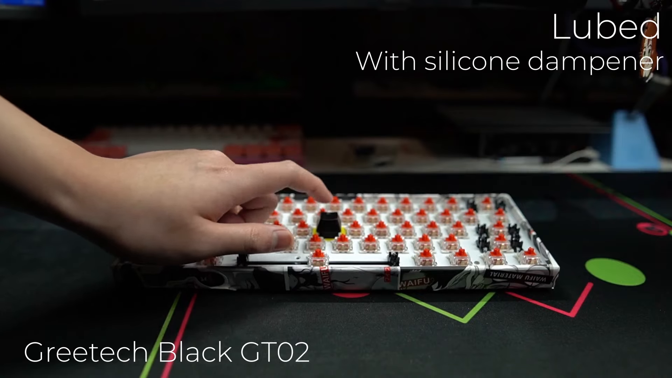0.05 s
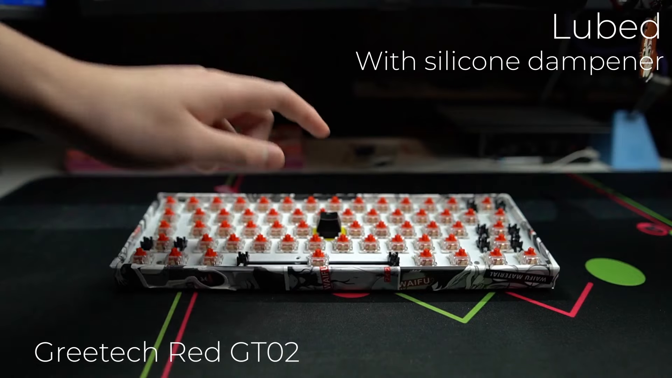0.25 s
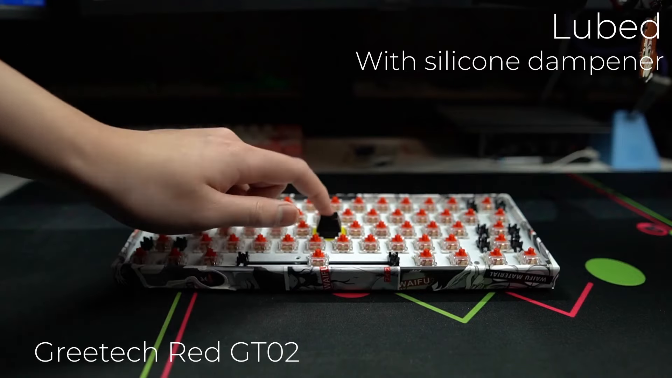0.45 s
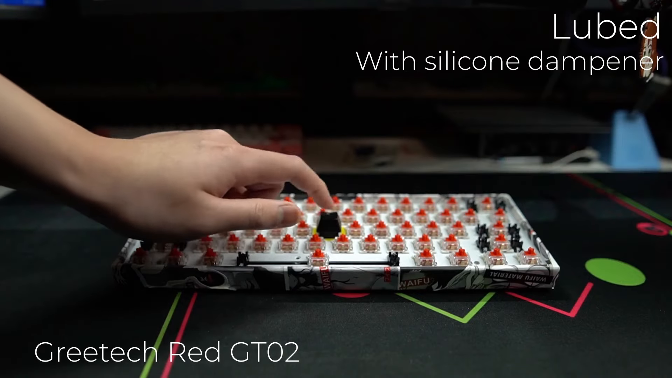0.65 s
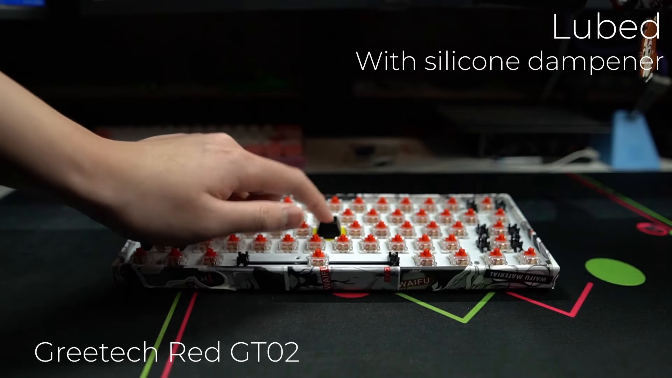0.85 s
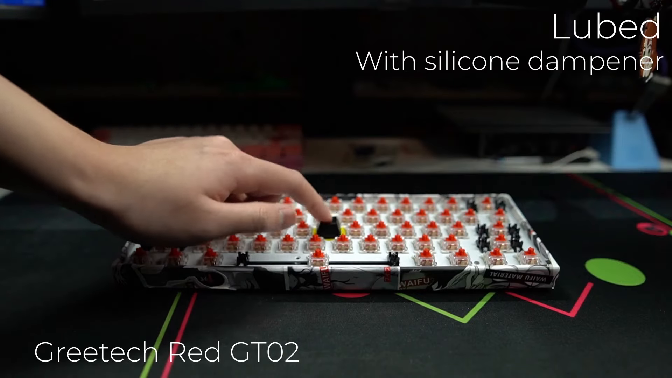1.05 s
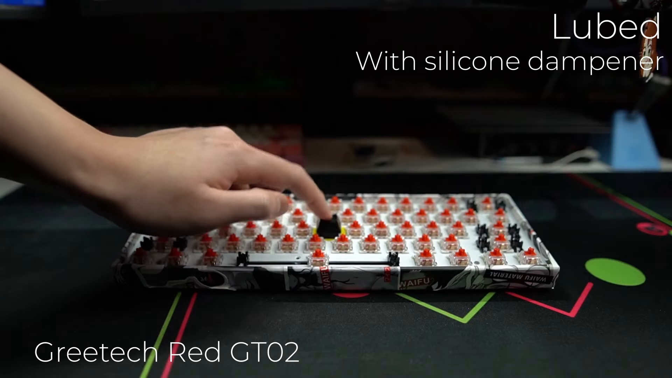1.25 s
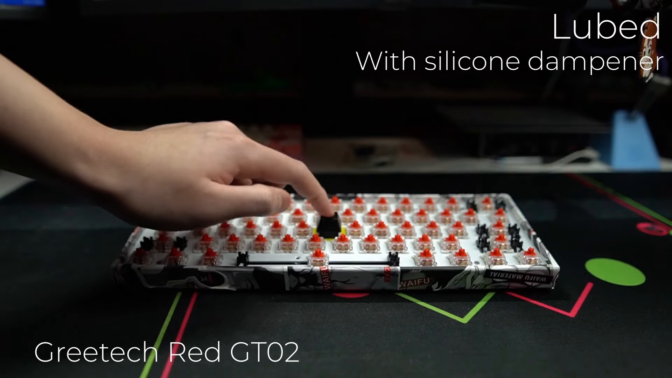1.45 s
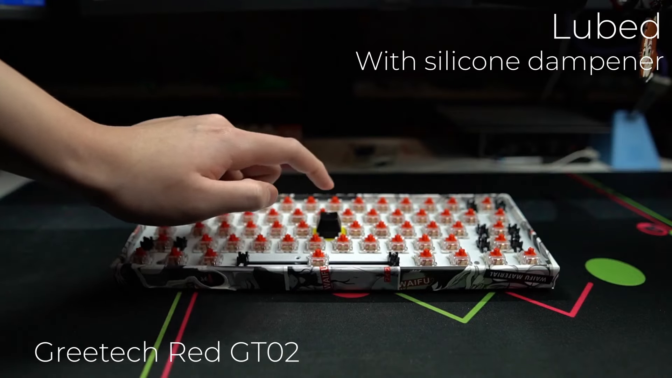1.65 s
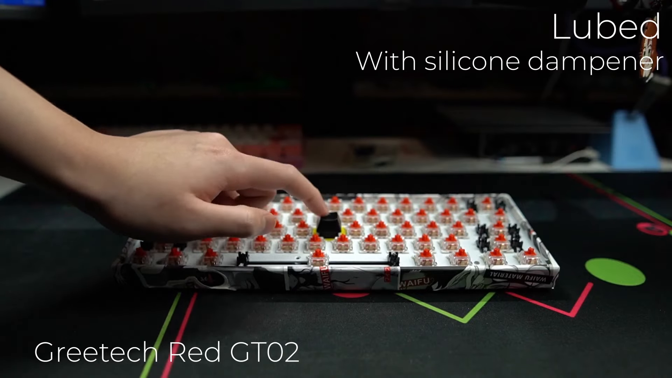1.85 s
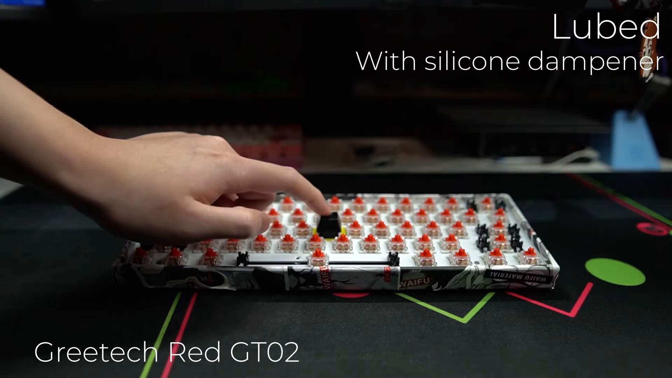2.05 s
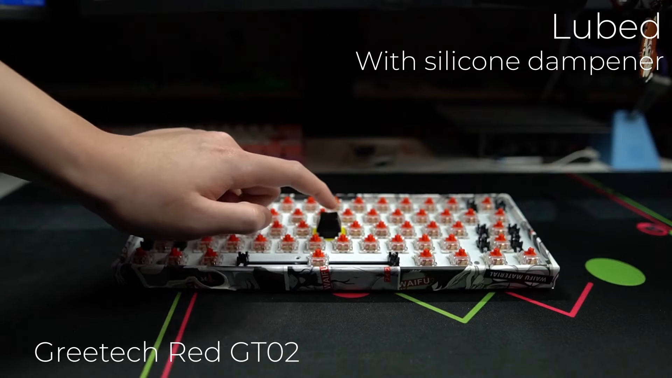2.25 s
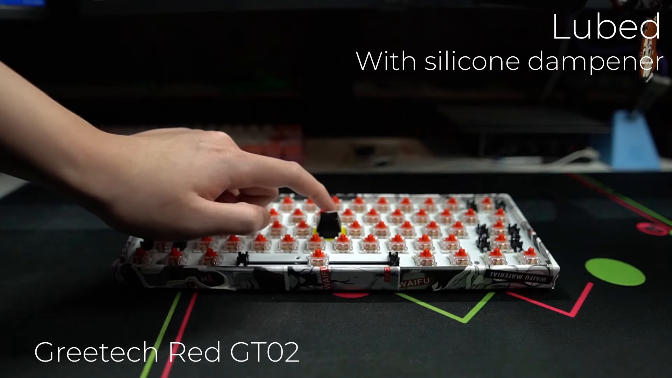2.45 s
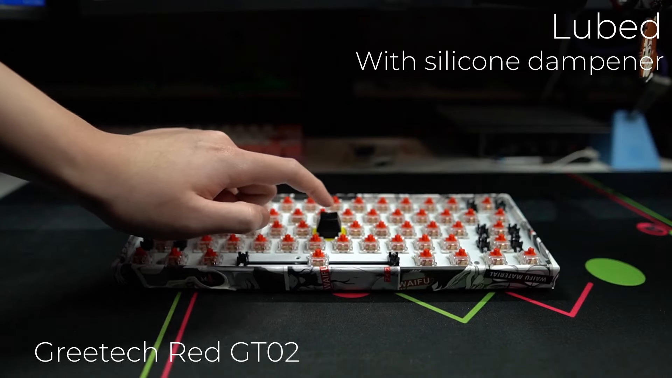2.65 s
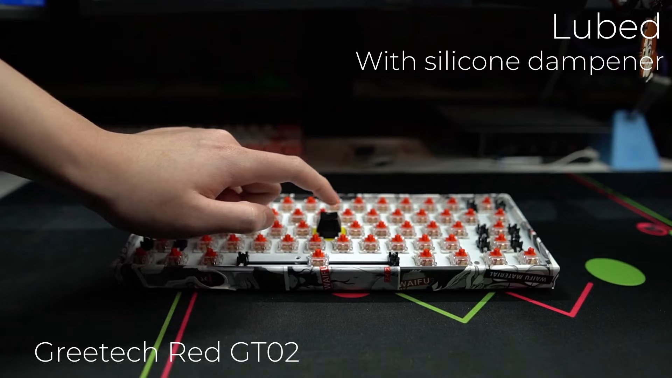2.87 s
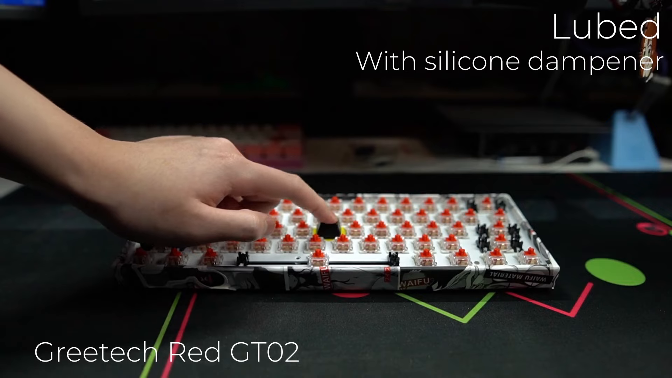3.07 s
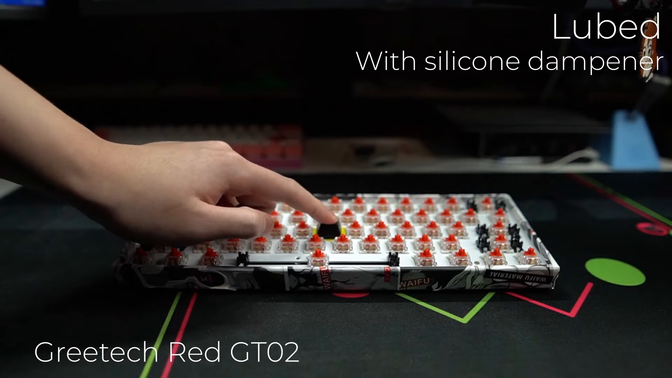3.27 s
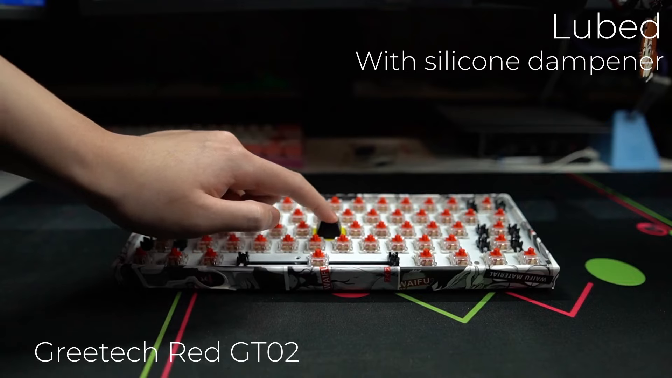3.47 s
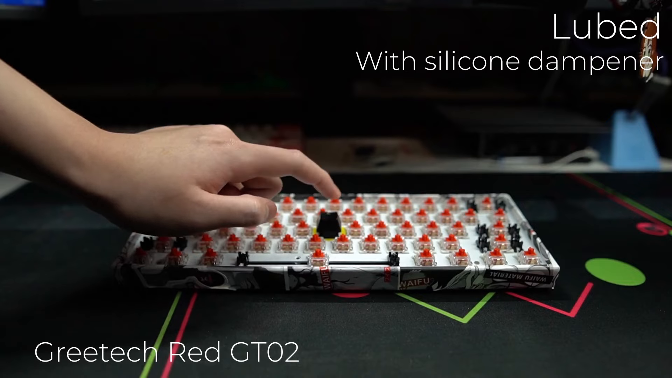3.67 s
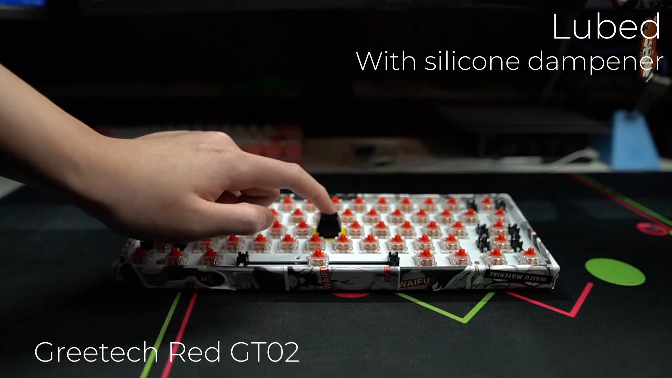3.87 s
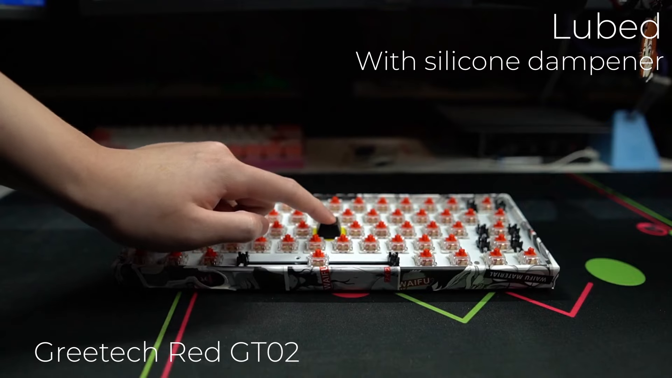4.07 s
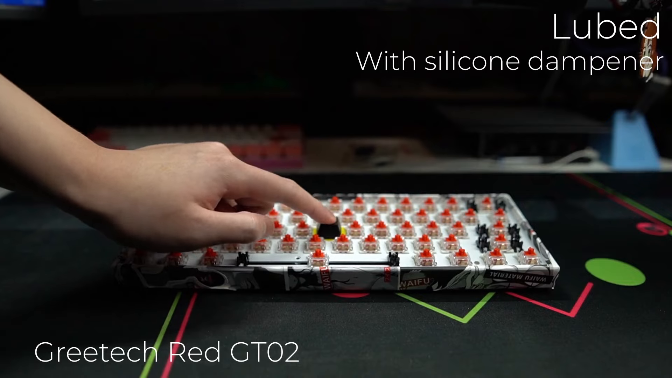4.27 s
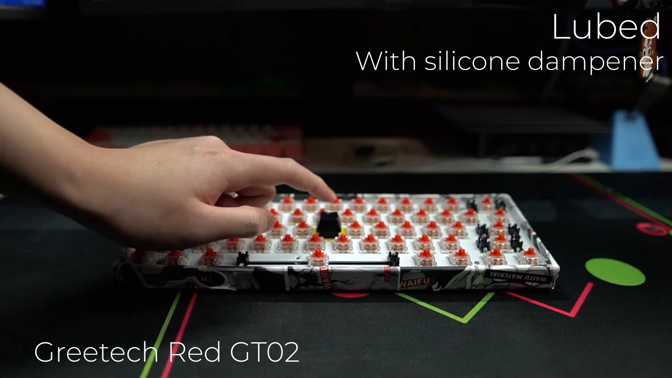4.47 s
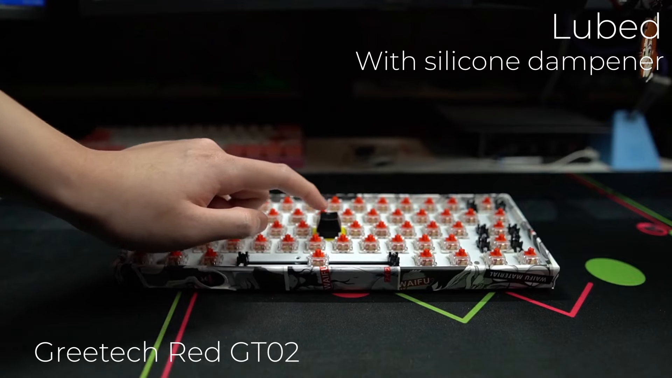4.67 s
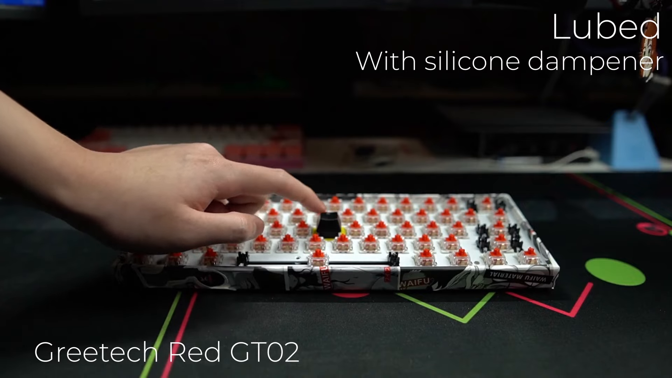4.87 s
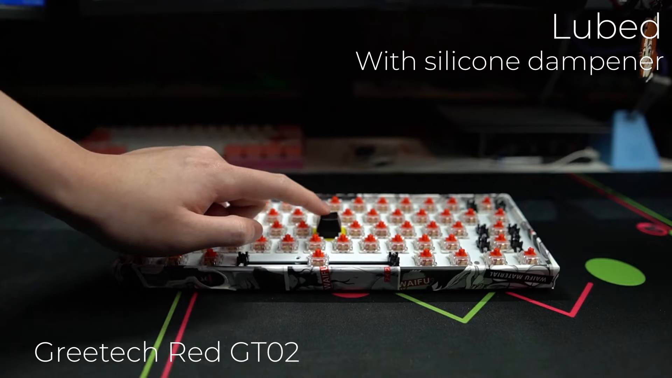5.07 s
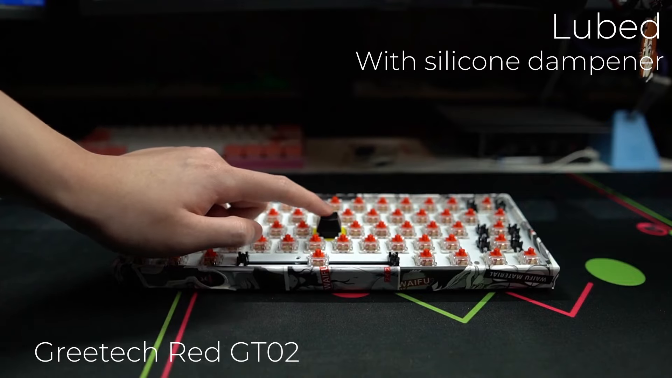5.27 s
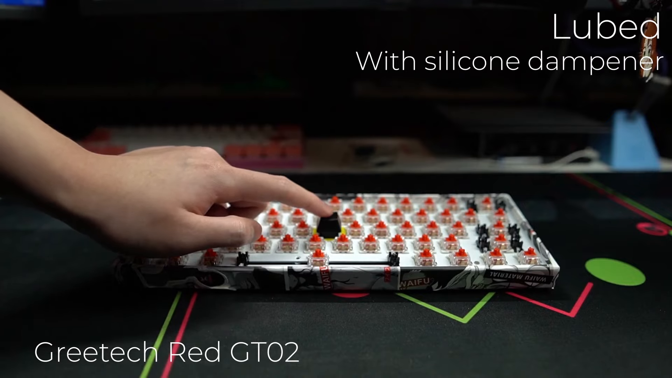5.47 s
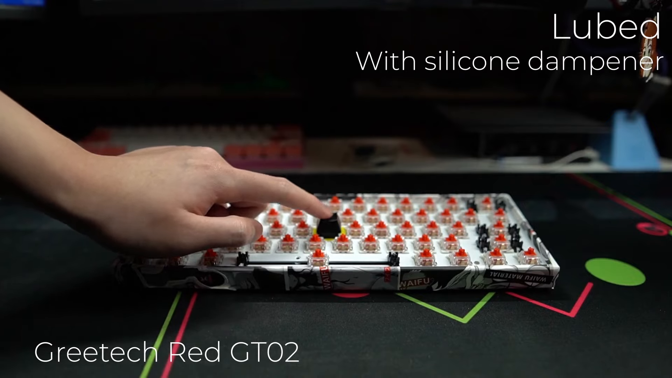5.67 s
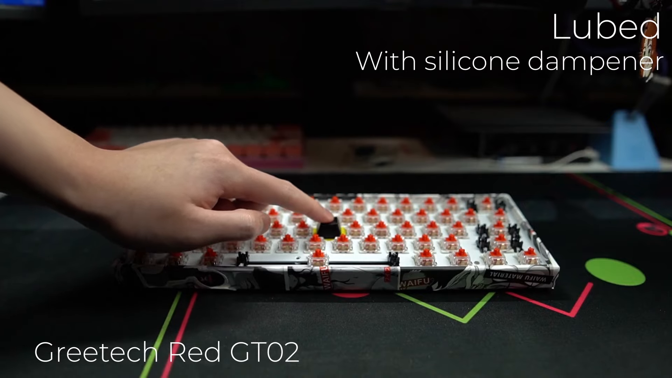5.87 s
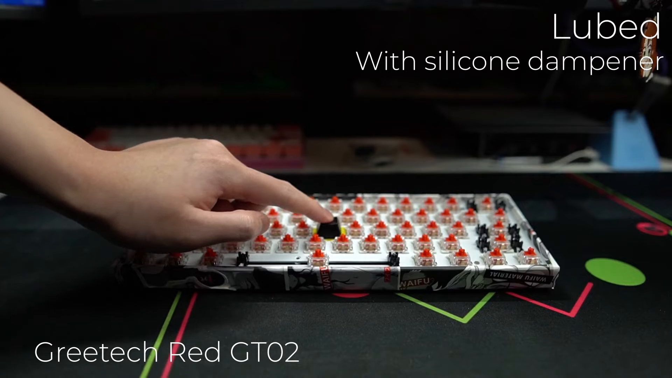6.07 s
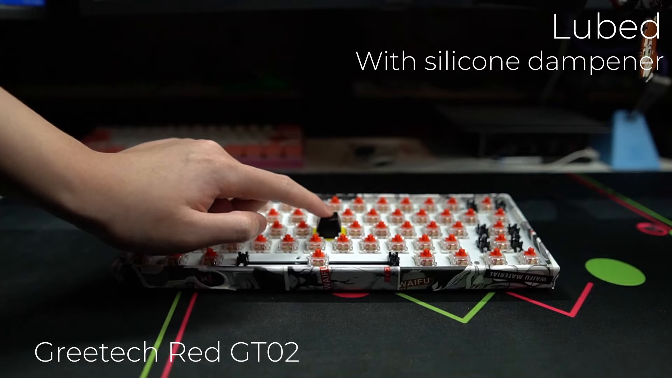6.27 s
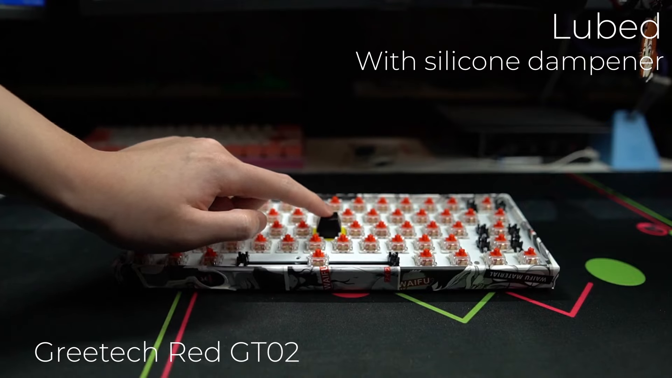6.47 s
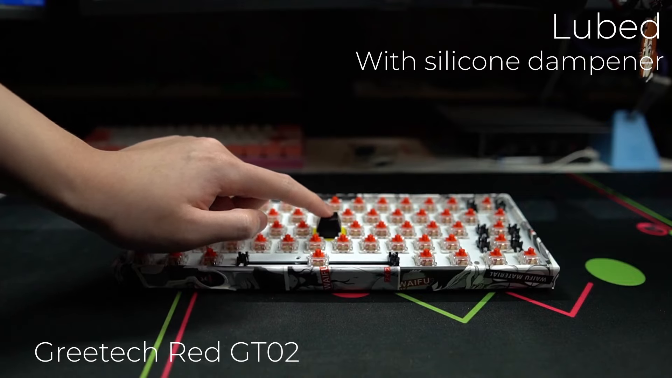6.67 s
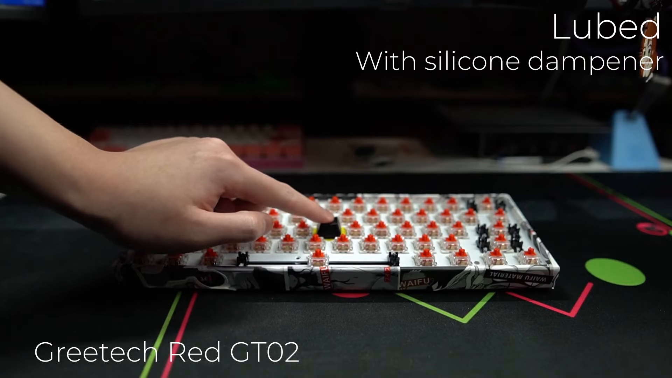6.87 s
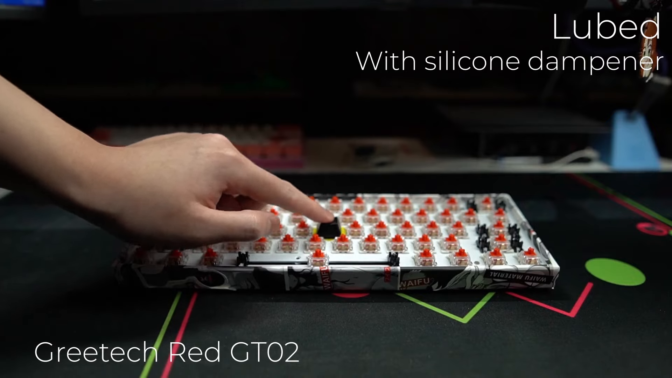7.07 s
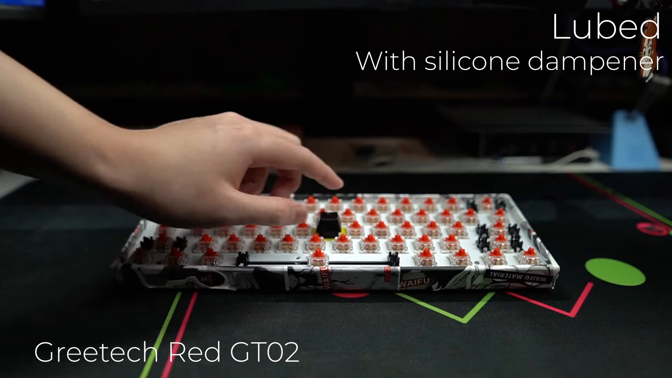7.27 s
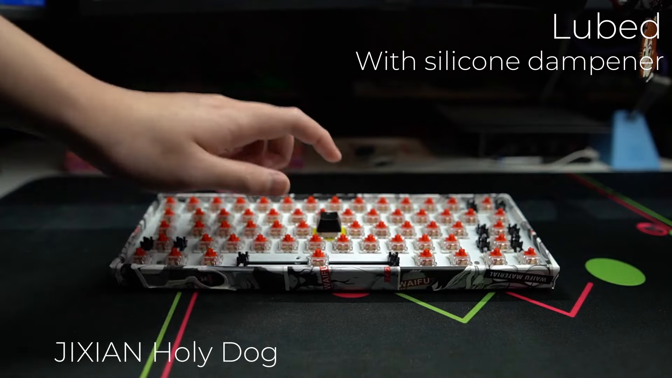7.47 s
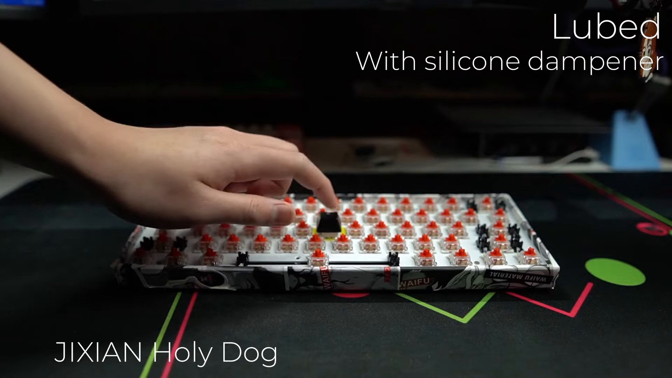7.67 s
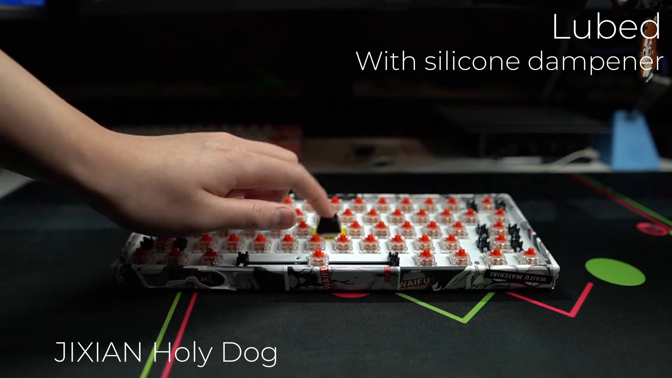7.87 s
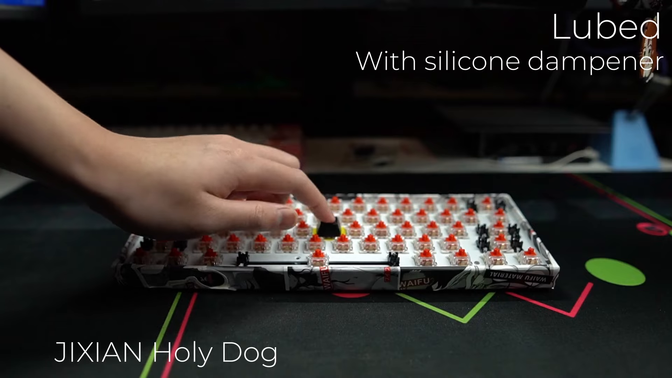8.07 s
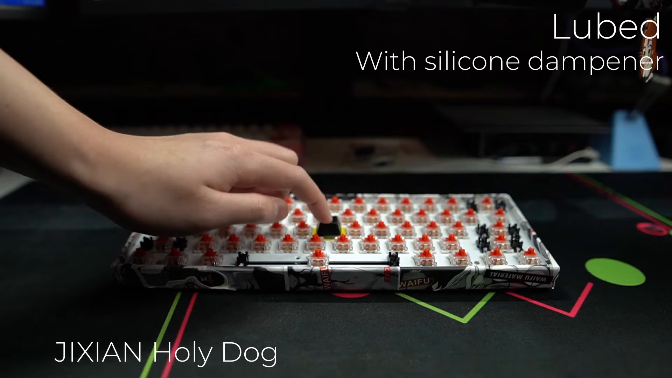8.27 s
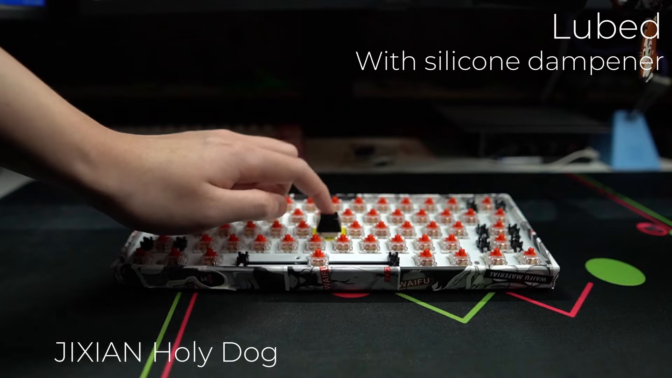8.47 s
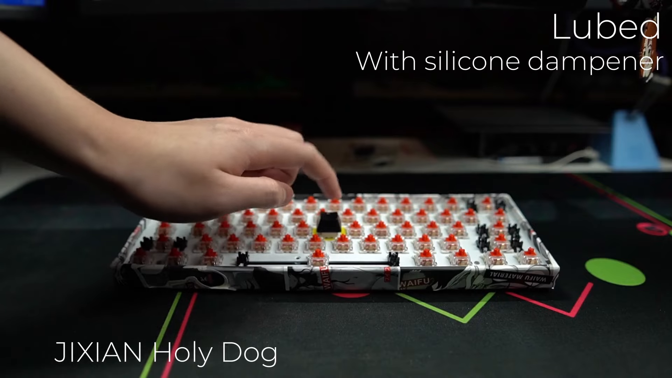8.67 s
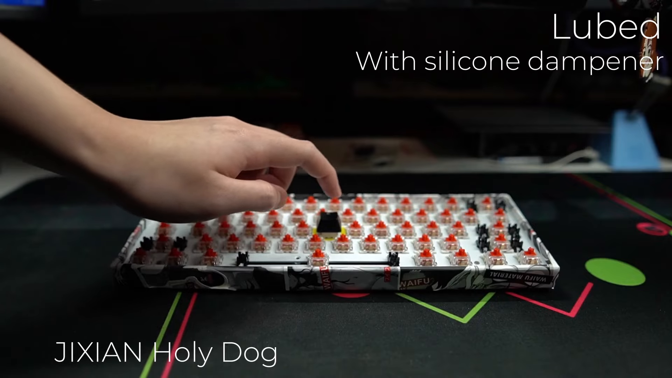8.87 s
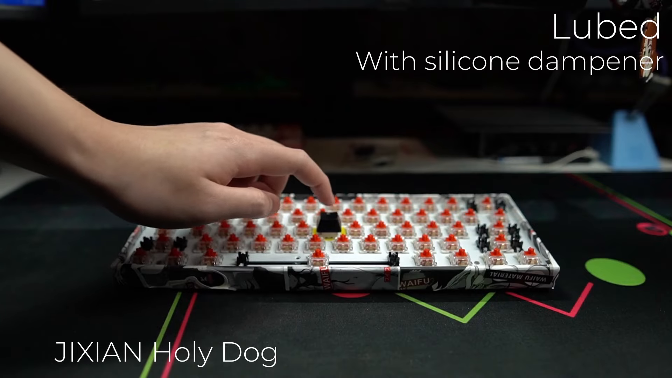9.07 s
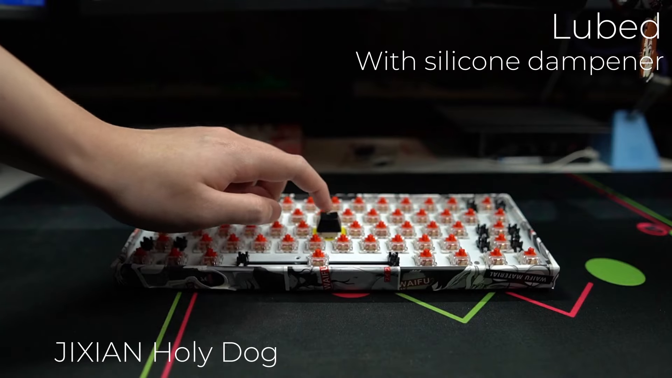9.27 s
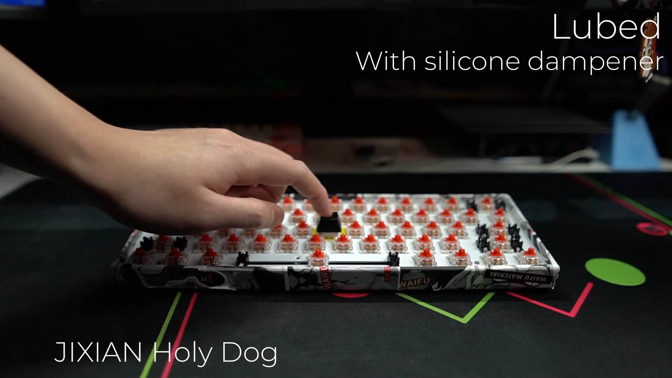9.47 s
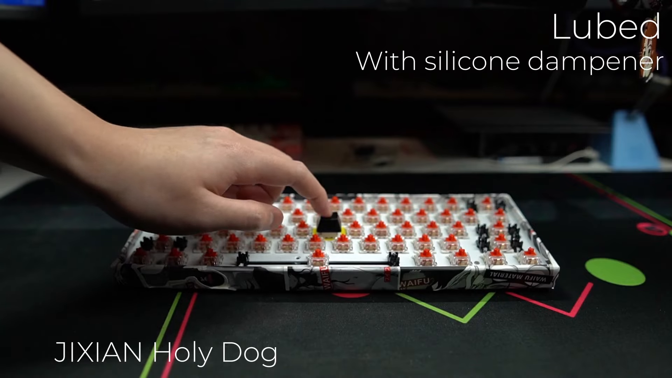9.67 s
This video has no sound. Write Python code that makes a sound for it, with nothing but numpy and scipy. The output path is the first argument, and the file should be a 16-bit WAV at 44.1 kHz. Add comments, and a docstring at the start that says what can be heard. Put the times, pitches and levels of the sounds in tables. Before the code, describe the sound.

Close up in a small indoor room, a fingertip taps one bare keyboard switch: bright plastic clacks at about six a second, light desk thuds beneath. The pace drops to a few slow, dull presses with grainy scrapes and quiet releases. Near the end a smoother second switch rattles through another rapid burst, its return knocks nearly as strong as some downstrokes, over soft fan noise.

```python
"""At a desk in a small room, one finger works a key of a bare mechanical keyboard on a mat: fast bursts, slow strokes.
From 7.4 s another switch sits in the board. Grainy noise scrapes as each stem travels; damped modes and a short
noise rattle sound when it strikes the plate or knocks its top housing. Echoes and a diffuse tail answer the switch.
Low modes thud in the desk and a faint low rustle passes once.
Behind lie coloured noise for fan and microphone hiss, and wavering sine tones from the fan far off."""
import sys
import numpy as np
from scipy import signal
from scipy.fft import rfft, irfft, next_fast_len
from scipy.io import wavfile
from scipy.ndimage import uniform_filter1d, map_coordinates

SR = 44100
rng = np.random.default_rng(int(sys.argv[2]) if len(sys.argv) > 2 else 0)


def pcm_store(signal):
    """Save signal as 16-bit PCM."""
    levels = np.round(np.clip(np.atleast_2d(signal), -1, 1) * 32767)
    wavfile.write(sys.argv[1], SR, levels.astype(np.int16).T)


def makeup_ratio(level_db):
    """Linear amplitude ratio for a level in decibels (20 dB per factor of ten)."""
    decades = np.asarray(level_db, float) / 20
    return 10 ** decades


N = 429093  # length in samples

# Key pushed down until the stem strikes the plate. Each row: strike in seconds, peak of the blow in dB,
# travel time in seconds, fingertip landing peak in dB, push on the desk in dB.
PRESSES = [(.4557, -8.5, .0066, -50, -48.5), (.6267, -23.5, .021, -36, -62), (.777, -16.5, .0142, -40, -51),
           (.9396, -14.5, .012, -42, -56), (1.1022, -12.5, .0122, -41, -55), (1.2658, -13, .011, -42, -55),
           (1.4411, -12.5, .013, -52, -57.5), (3.1318, -17.5, .027, -62, -66), (4.058, -24, .028, -54, -63),
           (5.7974, -28.5, .027, -64, -70), (6.8044, -26.5, .04, -60, -75), (7.6446, -19, .007, -36, -51),
           (7.8212, -46, .019, -44.5, -63), (7.9635, -22.5, .016, -45, -63), (8.1323, -15, .01, -50, -52.5),
           (8.2907, -15, .012, -52, -53.5), (8.4701, -13.5, .011, -52, -54),
           (8.6328, -11.5, .009, -44, -47)]
# Key let go until the stem knocks the top housing. Each row: knock in seconds, peak of the blow in dB,
# travel time in seconds, scrape rms before its fades in dB, case share in dB.
RELEASES = [(.042, -43, .01, -80, 19), (.5231, -26.5, .023, -63, 7.5), (.6863, -27, .021, -62.5, 8.5),
            (.851, -30.5, .021, -63, 6.5), (1.013, -29, .018, -70, 6.5), (1.1756, -27.5, .02, -62, 8.5),
            (1.3457, -29.5, .02, -59, 8.5), (1.5304, -32.5, .03, -66, 8.5), (3.5647, -41, .035, -70, 15),
            (4.478, -33.5, .026, -68, 15), (7.2173, -45.5, .034, -68, 34), (7.7041, -20, .014, -61, 2.5),
            (7.8754, -32.5, .015, -70.5, 5.5), (8.035, -27, .013, -63, -2), (8.2071, -20, .027, -64.5, 1.5),
            (8.3683, -20, .018, -70, 1.5), (8.5405, -21, .015, -64, .6), (8.7104, -18, .015, -58.5, -1.1)]
# Colour of plastic friction. Each row: frequency in Hz, relative level per Hz in dB.
FRICTION = [(600, -19), (1500, 4), (2500, 2.5), (4500, .6), (7000, -2), (9300, -4.5), (11000, -11.5),
            (16000, -26)]
SWAP_S = 7.4  # from here on another switch sits in the board


def unit(x):
    """Scale to rms 1."""
    return x / np.sqrt(np.mean(x ** 2) + 1e-20)


def along(points, hz):
    """Read a curve of (Hz, value) points on a log frequency axis."""
    f, value = np.transpose(points)
    return np.interp(np.log(hz + 1), np.log(f + 1), value)


def wobble(rate):
    """A smooth random curve with rate knots a second."""
    knots = rng.standard_normal(int(N * rate / SR) + 4)
    return map_coordinates(knots, [np.arange(N) * rate / SR])


def noise(gain_db, count):
    """White noise coloured by gain_db(Hz)."""
    m = next_fast_len(count)
    spectrum = rfft(rng.standard_normal(m))
    return irfft(spectrum * makeup_ratio(gain_db(np.fft.rfftfreq(m, 1 / SR))), m)[:count]


def ring(modes, tilt_db, spread_db, detune, rise_turns, length):
    """Damped modes set off together, each a little off in strength and pitch; low ones take longer to swell."""
    hz, db, t60 = np.transpose(modes)[:, :, None]
    strength_luck, pitch_luck = rng.standard_normal((2, len(modes), 1))
    t = np.arange(round(length * SR)) / SR
    decay = makeup_ratio(db + tilt_db(hz) + spread_db * strength_luck - 60 * t / t60)
    swell = 1 - np.exp(-t * hz / rise_turns)
    tones = np.sin(2 * np.pi * hz * (1 + detune * pitch_luck) * t)
    return np.sum(decay * swell * tones, axis=0)


def add(track, s, sound):
    """Mix a sound in at time s."""
    track[round(s * SR):][:len(sound)] += sound


def background():
    """Broad fan noise and hiss, with faint unsteady motor tones and one strong wavering tone."""
    # Fan noise and hiss. Each row: frequency in Hz, relative level per Hz in dB.
    air_colour = [(20, -58), (55, -32), (80, -27), (100, -7), (125, -12.5), (160, -6.5), (230, -12),
                  (400, -14), (600, -16.5), (1000, -21), (1900, -28.5), (2150, -28), (2400, -29.5),
                  (8000, -31.5), (14800, -32.5), (16200, -41)]
    # Faint motor tones. Each row: frequency in Hz, mid level in dB rms.
    faint_tones = [(398.4, -89), (899.0, -98), (1001, -90), (1260, -95), (2003, -94), (2159, -93)]
    air = noise(lambda hz: along(air_colour, hz), N)
    above = signal.sosfilt(signal.butter(4, 600, "high", fs=SR, output="sos"), air)
    air = air / np.std(above)
    air = air * makeup_ratio(-75 + .4 * wobble(3))  # about -75 dB rms above 600 Hz
    strong_hz = 291.5 + 1.5 * wobble(12)
    strong_db = -69 + 1.6 * wobble(5)  # rms
    strong = makeup_ratio(strong_db) * np.sin(2 * np.pi * np.cumsum(strong_hz) / SR)
    t = np.arange(N) / SR
    faint = np.zeros(N)
    for hz, db in faint_tones:
        level = makeup_ratio(db + 1.16 * wobble(8.8))
        faint += level * np.sin(2 * np.pi * hz * t + .8 * wobble(7.2))
    return air + np.sqrt(2) * (strong + faint)  # sine of rms 1 peaks at root 2


def rustle():
    """A faint low rustle: noise that falls off on both sides of its centre and swells and fades once."""
    # One row: start in seconds, end in seconds, rms before the fades in dB, centre in Hz.
    start, end, db, centre_hz = (4.97, 5.03, -68.5, 400)
    track = np.zeros(N + SR)
    count = round((end - start) * SR)
    grain = unit(noise(lambda hz: -30 * np.abs(np.log((hz + 1) / centre_hz)), count))
    add(track, start, makeup_ratio(db) * grain * np.hanning(count))
    return track[:N]


def desk():
    """A push gives a short low knock and sets longer desk modes ringing; letting go pushes more gently."""
    # Desk top. Each row: frequency in Hz, relative level in dB, t60 in seconds.
    desk_modes = [(118, 5, .16), (144.5, -1, .6), (169.5, -5.5, 0.94), (204, -3.5, 0.14)]
    release_db, ring_db = -10, -2.5  # release under the push of its press; trim of the modes at 130-190 Hz
    track = np.zeros(N + SR)
    pushes = [(row[0], row[-1]) for row in PRESSES]
    for s, *_ in RELEASES:
        earlier = [row for row in PRESSES if row[0] < s]
        if earlier:
            pushes.append((s, earlier[-1][-1] + release_db))
    for s, knock_db in pushes:
        share = lambda hz: knock_db + ring_db * ((hz > 130) & (hz < 190))
        add(track, s, ring(desk_modes, share, spread_db=1.5, detune=.008, rise_turns=.85, length=.9))
    return track[:N]


def room(sound):
    """Direct sound, near echoes, and a fresh diffuse tail that dies band by band."""
    # Desk, near objects and walls. Each row: delay in seconds, level against the direct sound in dB.
    reflections = [(.0006, -11.5), (.0031, -34), (.0045, -23.5), (0.0119, -26.5), (0.027, -39.5),
                   (.033, -36)]
    # Diffuse tail. Each row: frequency in Hz, t60 in seconds, relative level in dB.
    tail_bands = [(300, .3, 0), (1300, .3, 2), (2000, 0.42, 3), (2590, 0.21, -5.5), (3300, 0.29, 6.5),
                  (4270, 0.18, -4.5), (6000, 0.17, -2.5), (9300, .25, -1.5), (14000, 0.086, -1.5)]
    hz, t, z = signal.stft(rng.standard_normal(SR // 3), SR, nperseg=128)
    centre, t60, db = np.transpose(tail_bands)
    t60 = np.interp(hz, centre, t60)[:, None]
    db = np.interp(hz, centre, db)[:, None]
    tail = signal.istft(z * makeup_ratio(db - 60 * t / t60), SR, nperseg=128)[1]
    tail = tail * np.clip(np.arange(len(tail)) / (0.0029 * SR), 0, 1)  # reflections build up
    answer = makeup_ratio(-21.5) * tail / np.linalg.norm(tail)
    add(answer, 0, [1])  # direct sound
    for s, echo_db in reflections:
        add(answer, s, makeup_ratio([echo_db]))
    return signal.fftconvolve(sound, answer)


def contact(peak_db, case_db, plate_db, housing_db, rattle_db):
    """A plastic contact rings the keyboard; loose parts rattle on for some milliseconds."""
    # Case below, housing in the middle, cap on top. Each row: frequency in Hz, relative level in dB, t60 in seconds.
    keyboard_modes = [(550, -33, 0.056), (810, -37, .04), (978.2, -29.5, 0.035), (1280, -27, .028),
                      (1567, -27.5, 0.02), (1900, -28, 0.034), (2330, -17, 0.014), (2672, -21, 0.016),
                      (3700, -21, 0.004), (4065, -22.5, 0.012), (4300, -8.5, 0.0069), (5100, -22, .008),
                      (5920, -11.5, 0.003966), (6670, -6, .004), (7380, -13, 0.007), (7780, 1, 0.0028),
                      (9000, -23, 0.036), (9350, -30, 0.045), (9146, -12, .007), (9600, -20, .014),
                      (12300, -15, 0.0027), (13700, -24, 0.0027)]
    soft_db = -.4 * max(case_db, 0)  # a soft, case-heavy blow loses its top
    shares = [(1600, case_db), (2200, plate_db), (2800, plate_db), (3500, housing_db), (5800, housing_db),
              (6800, 0.0032), (10000, 0), (12000, soft_db)]
    tilt = lambda hz: along(shares, hz)
    blow = ring(keyboard_modes, tilt, spread_db=1.2, detune=.005, rise_turns=0.91, length=.08)
    t = np.arange(len(blow)) / SR
    rattle = unit(noise(lambda hz: along(FRICTION, hz) + tilt(hz), len(t)))
    rattle = rattle * makeup_ratio(-60 * t / 0.024) * (1 - np.exp(-t / 0.00058))  # t60 24 ms, quick swell
    return makeup_ratio(peak_db) * (blow / np.max(np.abs(blow)) + makeup_ratio(rattle_db) * rattle)


def slide(length, db, body_db):
    """Grainy friction: noise in uneven bursts while the stem travels."""
    count = max(round(length * SR), 64)
    body = [(2500, body_db), (5000, 3), (8000, -2)]
    rub = noise(lambda hz: along(FRICTION, hz) + along(body, hz), count)
    bursts = makeup_ratio(4 * unit(uniform_filter1d(rng.standard_normal(count), size=40)))
    return makeup_ratio(db) * unit(rub * bursts) * signal.windows.tukey(count, .25)


def stop(s, peak_db, case_db, rattle_db, slowing=0):
    """An end stop: plate and housing speak more the duller the blow, and a slow press fills them out."""
    plate_db = .8 + .35 * case_db + 2.8 * slowing
    housing_db = .3 + .27 * case_db + 2.8 * slowing
    if s > SWAP_S:  # colour of the second switch over the first
        plate_db, housing_db, rattle_db = plate_db + 2, housing_db - 2, rattle_db + 3
    return contact(peak_db, case_db, plate_db, housing_db, rattle_db)


def press(track, s, peak_db, travel, landing_db):
    """The fingertip lands, the stem scrapes down and strikes the plate; weak blows carry more case."""
    firm_db, firm_travel_s = -13, .012  # a firm press, the yardstick here
    slowing = np.log2(travel / firm_travel_s)  # doublings of travel time
    case_db = -3 + .026 * min(peak_db - firm_db, 0) ** 2 - 2.5 * slowing
    scrape_db = -53.5 - 14 * slowing
    if s > SWAP_S:
        scrape_db -= 6  # the second switch is smoother
    landing = contact(landing_db, case_db=10, plate_db=10, housing_db=2.1, rattle_db=-10)
    add(track, s - travel, room(landing))
    add(track, s - travel, room(slide(travel, scrape_db, body_db=-5)))
    add(track, s, room(stop(s, peak_db, case_db, -20 + 4.5 * slowing, slowing)))


def release(track, s, peak_db, travel, scrape_db, case_db):
    """The stem slides back up and knocks its top housing."""
    add(track, s - travel, room(slide(travel, scrape_db, body_db=-9)))
    add(track, s, room(stop(s, peak_db, case_db, rattle_db=-19)))


def switch():
    """All contacts and travel of the switch, each heard through the room."""
    # Stray ticks of cap, fingertip and rebounding stem. Each row: start in seconds, peak of the blow in dB,
    # case share in dB, housing share in dB.
    ticks = [(0.0089, -47.5, 2, 5), (3.1186, -49, 12, 3), (4.4469, -54, 8, 7.5), (6.308, -60, 30, 5),
             (7.1759, -56, 20, 13), (7.235, -56, 9, 7), (7.8788, -29.5, 5, 1), (8.037, -25.5, 6.5, 0)]
    # The stem creeps without reaching a stop. Each row: start in seconds, length in seconds,
    # rms before the fades in dB, body in dB.
    creeps = [(4.33, .04, -78.5, -8), (5.123, .009, -71.5, -4), (6.245, .024, -73, 7)]
    track = np.zeros(N + SR)
    for s, peak_db, travel, landing_db, _ in PRESSES:
        press(track, s, peak_db, travel, landing_db)
    for s, peak_db, travel, scrape_db, case_db in RELEASES:
        release(track, s, peak_db, travel, scrape_db, case_db)
    for s, peak_db, case_db, housing_db in ticks:
        add(track, s, room(contact(peak_db, case_db, case_db, housing_db, rattle_db=-10)))
    for start, length, db, body_db in creeps:
        add(track, start, room(slide(length, db, body_db)))
    return track[:N]


def scene():
    """Everything reaches one microphone, whose low cut trims the thuds."""
    low_cut = signal.butter(3, 68, "high", fs=SR, output="sos")
    near = signal.sosfilt(low_cut, switch() + desk() + rustle())
    return np.tile(near + background(), (2, 1))


def top_cut(x):
    """Nothing passes above the cut-off."""
    return signal.sosfilt(signal.butter(12, 16830, fs=SR, output="sos"), x)


def record(dry):
    """Left and right differ by a faint smear that follows the sound."""
    smear = rng.standard_normal(400) * makeup_ratio(-np.arange(400) / 20)  # 1 dB down every 20 samples
    side = makeup_ratio(-34) * signal.fftconvolve(dry[0], smear / np.linalg.norm(smear))[:N]
    return top_cut(dry + [side, -side])


dry = scene()
out = record(dry)
pcm_store(out)
```